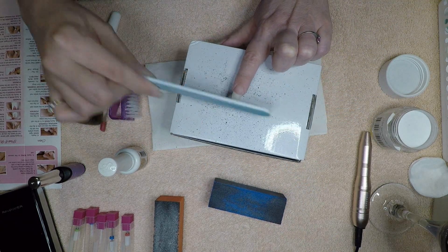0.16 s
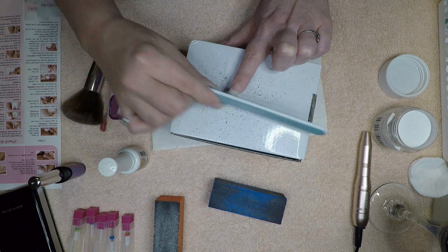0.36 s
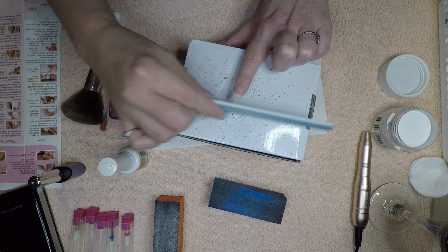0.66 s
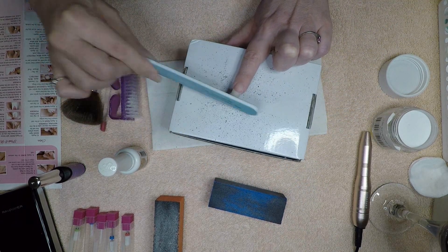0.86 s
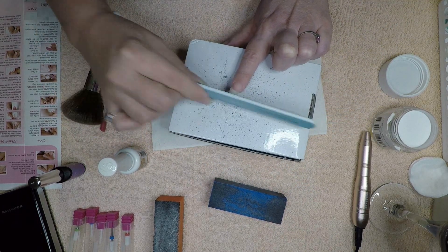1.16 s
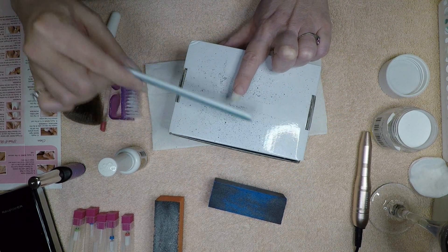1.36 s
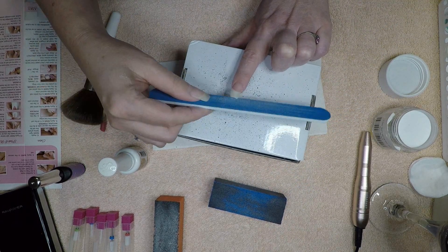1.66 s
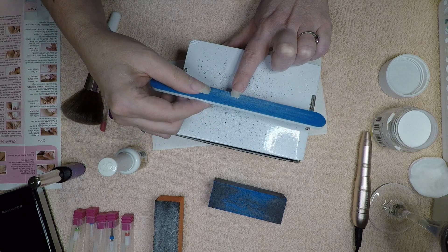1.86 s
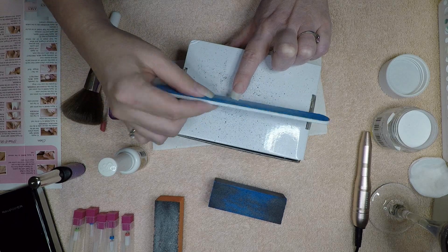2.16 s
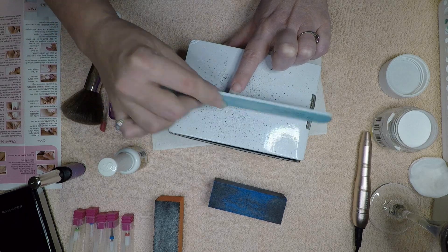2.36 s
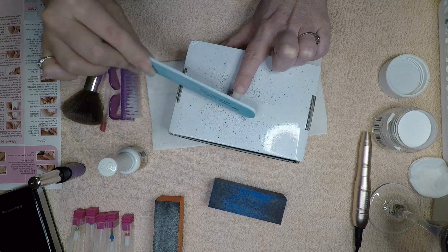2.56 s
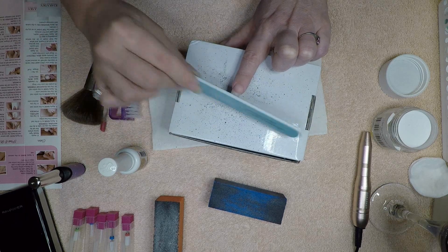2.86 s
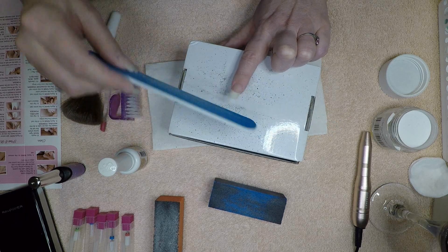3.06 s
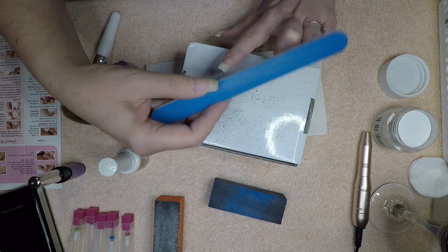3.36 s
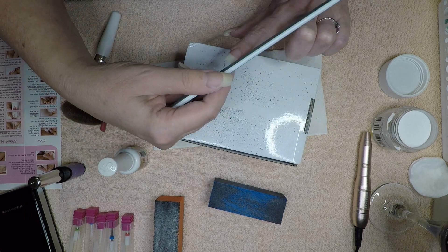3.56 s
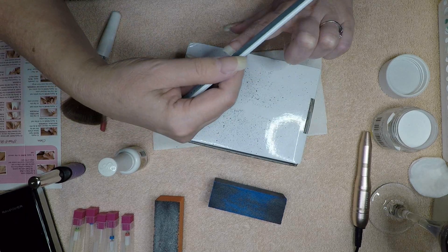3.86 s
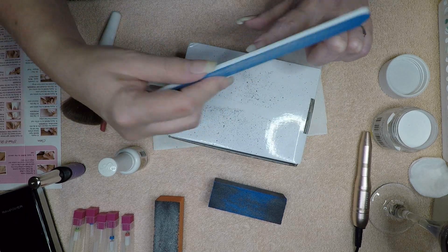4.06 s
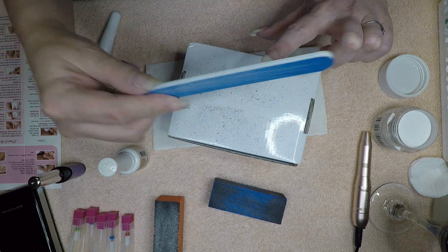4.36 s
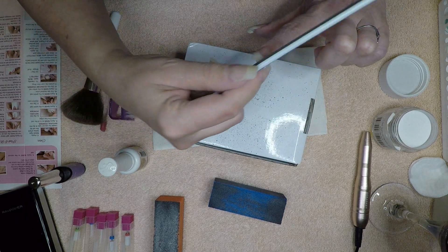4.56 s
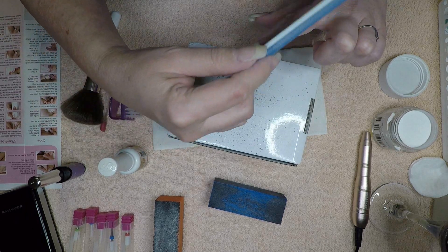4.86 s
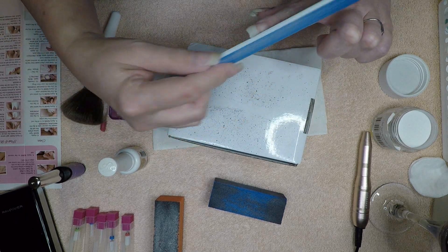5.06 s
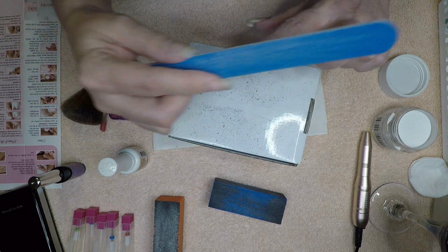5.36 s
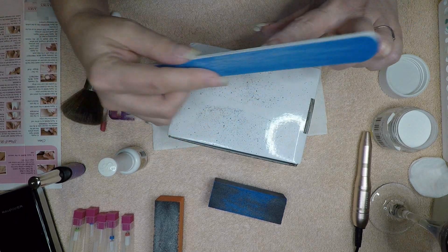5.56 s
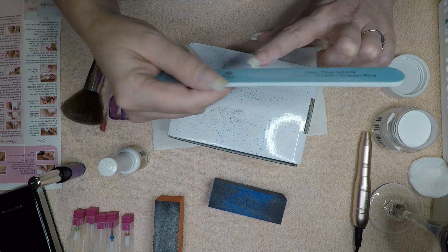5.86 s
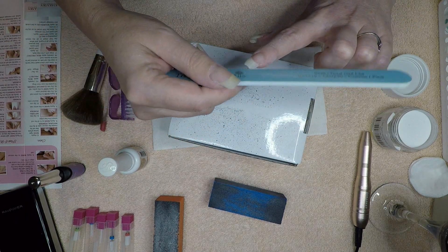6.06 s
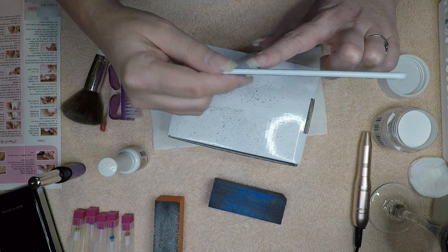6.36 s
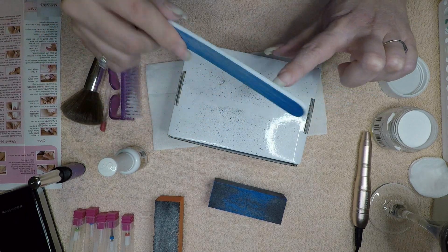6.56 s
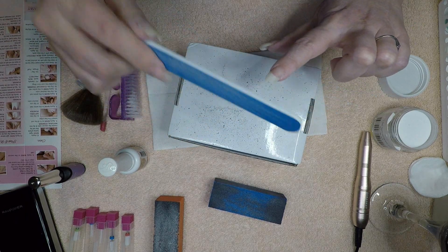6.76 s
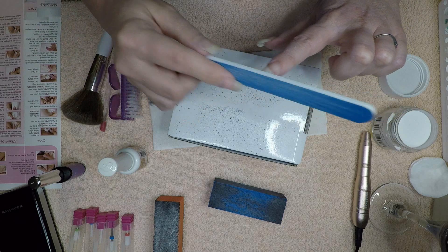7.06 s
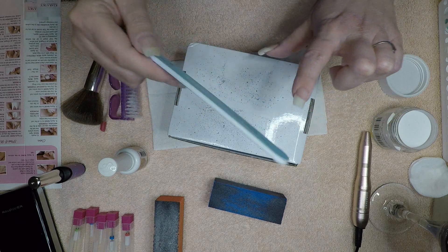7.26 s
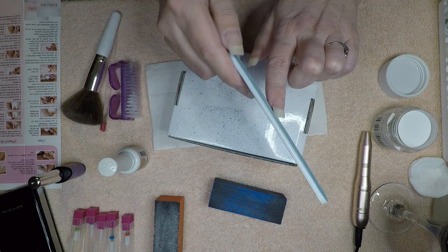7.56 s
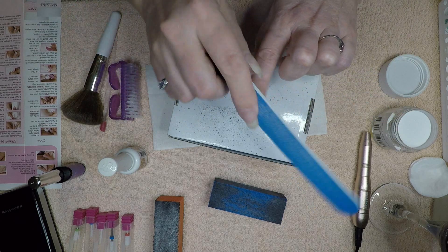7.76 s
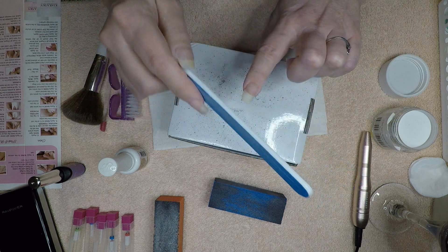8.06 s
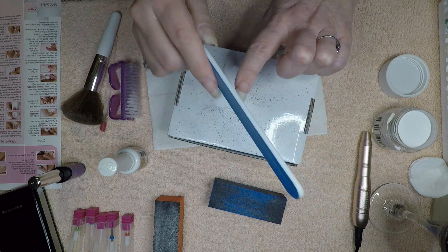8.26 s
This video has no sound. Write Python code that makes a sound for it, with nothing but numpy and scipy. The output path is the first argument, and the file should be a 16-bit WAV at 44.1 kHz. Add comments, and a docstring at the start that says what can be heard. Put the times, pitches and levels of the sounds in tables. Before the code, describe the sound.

A nail file rasps near the microphone, sandy and ringing high up, first in strong separate strokes with dull table rumble and a moderate bump, later in softer, thinner strokes without rumble. A single hard table knock at about three seconds is by far the loudest event. Dry little taps and brushing scuffs fill the gaps; a soft humming noise floor stays constant and room reflections are short.

```python
"""In a small quiet room, an emery board files fingernails over a table, close to a stereo microphone.
Each stroke is gritty noise that rings in nail and board; while the finger rests on the table, it rumbles along.
Around the strokes the board ticks, scuffs and brushes on the nail: short bursts of noise, each around one pitch.
The hand knocks the table, once hard: a crack, a short thud and long low rings. The room adds short reflections
to the nail sounds and knocks. Under it all lies the microphone's own steady noise."""
import sys
import numpy as np
from scipy import signal
from scipy.fft import rfft, irfft
from scipy.io import wavfile

SR = 44100
rng = np.random.default_rng(int(sys.argv[2]) if len(sys.argv) > 2 else 0)


def log_audio(samples):
    """Write samples as a 16-bit WAV file to the path given in sys.argv[1]."""
    # one column per channel
    frames = np.atleast_2d(samples).T
    # limit to full scale, then quantise
    limited = np.clip(frames, -1, 1)
    pcm = np.round(limited * 32767).astype(np.int16)
    wavfile.write(sys.argv[1], SR, pcm)


N = 370440
TIME = np.arange(N) / SR
HZ = np.maximum(np.arange(N // 2 + 1) * SR / N, 1)

# long rings of table and room after a knock; the level is before each knock's own ring level is added:
# (f/Hz, level re thud/dB, time to fall by 60 dB/s)
TABLE_RINGS = [(165.3, -24, 0.23), (187, -30, 0.27), (214.2, -13.5, 0.29), (263, -44, 0.23),
               (296, -17, 0.16), (332.4, -23.5, 0.3), (369.7, -20.5, 0.243), (396, -38, 0.4),
               (478, -38, 0.24), (553, -39, 0.25), (660, -45, .35), (987, -43, 0.27)]
# stereo width of the close sounds: (f/Hz, side minus mid/dB)
CLOSE_WIDTH = [(100, 11), (250, -13), (500, 5), (800, -3), (1200, -17), (1800, -6), (2800, -56),
               (4200, -21), (6400, -7), (8200, -2), (9800, 0), (12000, -1.5), (15000, -14)]
BITE_FOLLOWS, DRONE_FOLLOWS, RUMBLE_FOLLOWS = 0.69, 0.58, 0.4  # share of the stroke's swing in dB
EDGE_S, RUMBLE_RELEASE_S = 0.005, 0.026  # the rasp starts and stops this fast; the table rumbles on a little


def from_db(db):
    """Turn decibels into gain."""
    return 10 ** (np.asarray(db) / 20)


def rms_one(x):
    """Scale to unit power."""
    return x / np.sqrt(np.mean(x ** 2) + 1e-20)


def gain_at(points, hz=HZ):
    """Turn a spectrum table into gains, joined on a log-frequency axis."""
    at, db = np.transpose(points)
    return from_db(np.interp(np.log(hz), np.log(at), db))


def stereo(mid, side=0, pan_db=0):
    """Make left and right from mid and side; a positive pan leans left."""
    left = (mid + side) * from_db(pan_db / 2)
    right = (mid - side) * from_db(-pan_db / 2)
    return np.array([left, right])


def band(x, low_hz, high_hz, order=2):
    """Keep only the band between two frequencies."""
    return signal.sosfilt(signal.butter(order, [low_hz, high_hz], "band", fs=SR, output="sos"), x + 1e-18)


def high_pass(x, lowest_hz, order):
    """Take away what lies below the lowest frequency."""
    return signal.sosfilt(signal.butter(order, lowest_hz, "high", fs=SR, output="sos"), x)


def resonance(centre_hz, width_hz, hz=HZ):
    """Gain of one resonance, 1 on top."""
    return 1 / np.sqrt(1 + ((hz ** 2 - centre_hz ** 2) / (hz * width_hz)) ** 2)


def noise(gain):
    """Steady noise of the given colour, unit power."""
    return rms_one(irfft(rfft(rng.standard_normal(N)) * gain, N))


def add(out, s, sound):
    """Mix a sound in from time s."""
    start = max(round(s * SR), 0)
    out[:, start:start + sound.shape[1]] += sound[:, :N - start]


def microphone_noise(mid_db=-49.5, side_db=-48.5):
    """The microphone's own steady noise, strongest low down and wide between the ears."""
    # colour of the middle: (f/Hz, relative level per Hz/dB)
    mid_colour = [(20, -25), (33, -19.5), (70, -29), (110, -35.5), (150, 1), (195, -2), (240, 0.5),
                  (310, -9), (500, -15), (900, -21.5), (2000, -25.5), (4800, -31.5), (6200, -28),
                  (10000, -31.5), (15000, -46)]
    # colour of the difference between the ears: (f/Hz, relative level per Hz/dB)
    side_colour = [(20, -33), (80, -36), (115, -25), (155, 6.5), (200, -1.5), (260, 0.5), (330, -1.5),
                   (900, -4), (2000, -16), (4400, -32), (6200, -22), (10000, -26), (15000, -39)]
    mid = from_db(mid_db) * noise(gain_at(mid_colour))
    side = from_db(side_db) * noise(gain_at(side_colour))
    return stereo(mid, side, pan_db=-1.0)


def reverb(x, first_echo_s=0.004, t60_s=0.37):
    """Dense reflections of the small room, different at each ear: noise that falls by 60 dB in t60_s."""
    t = TIME[:SR // 2]
    tail = rng.standard_normal((2, len(t))) * from_db(-60 * t / t60_s) * (t > first_echo_s)
    tail = tail / np.sqrt((tail ** 2).sum(axis=1, keepdims=True))
    return signal.fftconvolve(x, tail, axes=1)[:, :N]


def without_deep_bass(x, lowest_hz=130):
    """The microphone picks up no deep bass: a steep low cut."""
    return high_pass(x, lowest_hz, order=7)


def contact(start_s, end_s, release_s):
    """The board lands quickly, stays, and its sound dies away after it lifts."""
    landing = np.clip((TIME - start_s) / EDGE_S + 1, 0, 1)
    return landing * np.exp(-np.maximum(TIME - end_s, 0) / release_s)


def swing_db(start_s, rise_s, fall_s, landing_db, fade_db):
    """A stroke speeds up to its height and slows again: an arch in dB, 0 at the height."""
    late = TIME - start_s - rise_s
    before = landing_db * np.clip(late / rise_s, -1, 0) ** 2
    after = fade_db * np.clip(late / fall_s, 0, 1) ** 2
    return -before - after


def propped_gains():
    """Hiss, bite and table rumble all follow the swing of each stroke with the finger propped on the table."""
    # levels at the height, before each layer's trim: (start/s, rise/s, fall/s, hiss level/dB,
    # landing below the height/dB, fade by the end/dB, bite level re hiss/dB, rumble level/dB)
    strokes = [ (0.077, 0.065, 0.11, -34.5, 6.5, 25.5, -10.5, -35),
               (0.458, 0.049, 0.11, -31.5, 4, 23, -11.5, -34.5),
               (0.846, 0.046, 0.12, -33, 4, 23.5, -12, -35),
               (1.244, 0.055, 0.14, -33.5, 2.5, 20.5, -12, -35),
               (2.457, 0.11, .112, -38, 8, 15.5, -11, -40.5),
               (2.922, 0.079, 0.04, -35.5, 9, -1.5, -11.5, -41.5)]
    hiss, bite, rumble = np.zeros((3, N))
    for s, rise, fall, db, landing_db, fade_db, bite_db, rumble_db in strokes:
        end = s + rise + fall
        swing = swing_db(s, rise, fall, landing_db, fade_db)
        touching = contact(s, end, EDGE_S)
        hiss += touching * from_db(db + swing)
        bite += touching * from_db(db + bite_db + BITE_FOLLOWS * swing)
        rumble += contact(s, end, RUMBLE_RELEASE_S) * from_db(rumble_db + RUMBLE_FOLLOWS * swing)
    return hiss, bite, rumble


def table_rumble(level_db=-0.1, side_db=-15, boom_db=3, shift_decay_s=0.033):
    """The rubbing travels down the propped finger into the table, whose lowest mode booms along."""
    # colour of the rumble: (f/Hz, relative level per Hz/dB)
    rumble_colour = [(20, -70), (70, -48), (118, -42), (146, 2.5), (210, 3), (280, 4), (370, -3),
                     (450, -6.5), (580, -21), (730, -17), (900, -56), (2000, -57)]
    # the propped finger shifts on the table: (time/s, rumble level before level_db/dB)
    finger_shifts = [(0.031, -35.5), (0.80, -40.5), (1.02, -50), (1.19, -46), (1.415, -43), (1.575, -48),
                     (1.772, -48), (2.26, -43.5), (2.888, -42)]
    boom = from_db(boom_db) * resonance(TABLE_RINGS[0][0], width_hz=8.4)
    colour = gain_at(rumble_colour) * np.sqrt(1 + boom ** 2)
    drag = stereo(noise(colour), from_db(side_db) * noise(colour), pan_db=-4.5)
    _, _, strokes = propped_gains()
    shifts = sum(from_db(db) * contact(s, s, shift_decay_s) for s, db in finger_shifts)
    return without_deep_bass(from_db(level_db) * np.hypot(strokes, shifts) * drag)


def crack(pitch_hz, overtone_db, overtone_ratio=2.23):
    """Two short, heavily damped rings at the point of contact; the lower one peaks at 1."""
    click = signal.unit_impulse(SR // 2)
    over_hz = overtone_ratio * pitch_hz
    low = band(click, 0.76 * pitch_hz, 1.26 * pitch_hz)
    high = band(click, 0.73 * over_hz, 0.97 * over_hz)
    return low / abs(low).max() + from_db(overtone_db) * high / abs(high).max()


def knocks(thud_hz=284, thud_at_s=0.00518, ring_delay_s=0.00508, crack_room_db=-7, thud_room_db=-15):
    """A dull crack at the contact, a thud that swells and dies in a few cycles, and long low rings."""
    # the hand bumps the table: (time/s, thud level/dB, thud length/s, long rings re thud/dB,
    # crack level/dB, crack f/Hz, its overtone re crack/dB)
    bumps = [(0.018, -33, 0.0034, 4.5, -47, 1190, -9), (0.4071, -13, .002, -3.5, -32.5, 1540, -2.5),
             (0.788, -27.5, 0.0028, -6, -55, 1500, -5), (1.177, -32.5, 0.0033, -7, -50, 1500, -9),
             (2.257, -34, .0028, 2, -55, 1500, -5), (3.048, -0.9, .0029, 0, -19, 1140, -11.5),
             (5.543, -34, 0.0018, -6, -44, 1500, -7)]
    t = TIME[:SR // 2]
    late = np.maximum(t - ring_delay_s, 0)
    rings = np.zeros(len(t))
    for k, (hz, db, t60) in enumerate(TABLE_RINGS):
        sign = (-1) ** k  # every second ring starts downwards
        rings += sign * from_db(db - 60 * late / t60) * np.sin(2 * np.pi * hz * late)
    thuds, cracks = np.zeros((2, 2, N))
    for s, thud_db, length_s, ring_db, crack_db, hz, overtone_db in bumps:
        around = t - thud_at_s
        thud = np.exp(-(around / length_s) ** 2) * np.sin(2 * np.pi * thud_hz * around)
        body = without_deep_bass(from_db(ring_db) * rings - thud, lowest_hz=142)
        add(thuds, s, stereo(from_db(thud_db) * body, pan_db=-4.5))
        add(cracks, s, stereo(-from_db(crack_db) * crack(hz, overtone_db)))
    thuds_in_room = thuds + from_db(thud_room_db) * reverb(thuds)
    return thuds_in_room + cracks + from_db(crack_room_db) * reverb(cracks)


def touch(envelope, pitch_hz, width_hz, top_re_pitch=1.41, sheen=0.24, grain_db=5.0):
    """A brief burst of gritty friction that rings around one pitch, with a faint sheen above it."""
    # colour of a nail touched lightly while a fingertip holds it: (f/Hz, gain/dB)
    fingertip_colour = [(1000, 2.5), (3000, 1), (4200, -1), (4950, -4), (5450, 1.5), (6100, 3.5), (6800, 3),
                        (8000, -1), (10000, 2), (11400, -7), (13500, -1)]
    size = len(envelope)
    hz = np.maximum(np.arange(size // 2 + 1) * SR / size, 1)
    top = sheen + 1 / (1 + (hz / (top_re_pitch * pitch_hz)) ** 10)
    grains = rng.standard_normal((2, size)) * from_db(grain_db * np.minimum(rng.exponential(1, size), 5))
    colour = resonance(pitch_hz, width_hz, hz) * top * gain_at(fingertip_colour, hz)
    mid, side = rfft(grains) * colour
    mid = irfft(mid, size)
    side = irfft(side * gain_at(CLOSE_WIDTH, hz), size)
    return envelope * stereo(mid, side) / np.std(mid)


def swell(late, rise_s, fall_s):
    """A bell-shaped envelope with its top at time 0 and unequal sides."""
    return np.exp(-(late / np.where(late < 0, rise_s, fall_s)) ** 2 / 2 ** .5)


def ticks_and_scuffs(tick_breadth=11, tick_rise_s=0.00097):
    """Taps start at once and die, the shorter the broader; scuffs swell, stop and trail; brushes fade."""
    # the board taps the nail: (start/s, level before the quick rise and decay/dB, f/Hz, decay/s)
    taps = [(0.012, -42, 6540, 0.0041), (0.025, -30, 7100, 0.0057), (0.246, -39.5, 7250, .0037),
            (0.408, -35.5, 6340, 0.0024), (0.616, -36, 6800, 0.0025), (0.786, -36.5, 6800, .0023),
            (1.175, -36, 6850, 0.0025), (1.776, -47.5, 6360, .004), (2.256, -37, 6740, .0035),
            (2.264, -32.5, 7040, .003), (2.385, -43, 6800, .003), (2.883, -52, 6780, .003),
            (3.249, -40, 6200, 0.0046), (3.353, -43, 6150, .0067), (3.456, -43, 6100, .0065),
            (3.555, -40, 6000, .0029), (4.378, -23.5, 7900, 0.0014), (4.683, -30.5, 5600, .0053),
            (4.811, -35, 5700, 0.004), (5.545, -38, 5500, .0027), (7.083, -46, 6500, .003),
            (7.559, -47, 6600, 0.0073), (8.267, -39.5, 6860, .0025), (8.276, -42, 6500, .003)]
    # the board catches the nail in a short scuff: (height at/s, rise/s, level/dB, f/Hz, breadth of ring/Hz)
    catches = [(3.055, 0.016, -40, 5860, 1400), (3.080, .0094, -39, 6460, 1000),
               (3.098, 0.015, -35, 6230, 1380), (3.181, 0.018, -48.5, 6260, 1800),
               (3.372, .015, -40, 6400, 1910), (3.571, 0.0085, -37.5, 5950, 450),
               (3.757, .012, -49.5, 6060, 1800), (3.830, 0.022, -54.5, 6250, 1800),
               (4.652, 0.017, -51.5, 6000, 3500), (5.351, 0.0082, -28.5, 6250, 1860),
               (5.628, .01, -38, 6160, 1800), (6.167, .011, -50.5, 5340, 2500),
               (7.274, 0.012, -34.5, 6200, 2800), (7.897, 0.024, -30, 6340, 2600),
               (7.988, 0.018, -33.5, 5820, 2010)]
    # the board brushes the nail while it is moved into place: (height at/s, fall/s, level/dB)
    brush_strokes = [(1.574, 0.027, -51.5), (3.121, 0.036, -55), (3.237, 0.2, -58.5), (3.413, 0.033, -54),
                     (3.499, 0.055, -57), (3.928, 0.035, -56.5), (4.384, .035, -53.5),
                     (4.719, 0.099, -54.5), (4.986, .028, -51), (5.845, 0.057, -55.5), (6.945, 0.031, -52),
                     (7.40, .065, -57)]
    scuff_fall_share = 0.55  # a scuff stops faster than it swells
    trail_db, trail_s = -17, 0.04  # and the board trails on lightly after it
    brush_hz, brush_width_hz, brush_rise_share = 6530, 4600, 0.55
    out, t = np.zeros((2, N)), TIME[:2 ** 14]
    for s, db, hz, decay in taps:
        envelope = (1 - np.exp(-t / tick_rise_s)) * np.exp(-t / decay)
        add(out, s, touch(from_db(db) * envelope, hz, tick_breadth / decay))
    late = t - t.mean()  # time 0 in the middle, for the height
    for s, rise, db, hz, width in catches:
        main = swell(late, rise, scuff_fall_share * rise)
        trail = from_db(trail_db) * swell(late, rise, trail_s)
        add(out, s - t.mean(), touch(from_db(db) * np.maximum(main, trail), hz, width))
    for s, fall, db in brush_strokes:
        envelope = from_db(db) * swell(late, brush_rise_share * fall, fall)
        add(out, s - t.mean(), touch(envelope, brush_hz, brush_width_hz))
    return out


def grit(gain, grain_db=3.5, chatter_db=0.5, chatter_hz=110):
    """Countless uneven grains catch on the nail, in clumps as the board sticks and slips; unit mid power."""
    clumps = from_db(chatter_db * noise(1 / (1 + (HZ / chatter_hz) ** 2)))
    sizes = from_db(grain_db * np.minimum(rng.exponential(1, N), 6))
    mid, side = irfft(rfft(rng.standard_normal((2, N)) * sizes * clumps) * gain, N)
    side = irfft(rfft(side) * gain_at(CLOSE_WIDTH), N)
    return stereo(mid, side) / np.std(mid)


def nail_ring(ring_db):
    """The resonances of nail and board, as a gain over the plain rasp."""
    # (f/Hz, width/Hz, level over the plain rasp before ring_db is added/dB)
    nail_modes = [(5680, 440, 11), (6596, 220, 11), (7710, 160, 7), (8580, 310, 5.5), (9240, 320, 8),
                  (12900, 900, -10)]
    power = sum((from_db(db + ring_db) * resonance(hz, width)) ** 2 for hz, width, db in nail_modes)
    return np.sqrt(1 + power)


def pressure(wobble_db=1.0, wobble_hz=21.3):
    """The hand's pressure is never quite even: a slowly wandering gain about 1."""
    return from_db(wobble_db * noise(1 / (1 + (HZ / wobble_hz) ** 4)))


def gliding_echo(x, strength=.5, delay_s=.0008, sway=.3, sway_hz=2.62):
    """A reflection off the table whose path changes as the hands move, so that bands glide through the rasp."""
    delay = delay_s * np.exp(sway * noise(1 / (1 + (HZ / sway_hz) ** 4)))
    echo = np.array([np.interp(TIME - delay, TIME, ear) for ear in x])
    return (x + strength * echo) / np.sqrt(1 + strength ** 2)


def lifted_gains(release_s=0.0098):
    """Hiss, bite and the drone of the board all follow the swing of each stroke with the finger lifted."""
    # levels at the height, before each layer's trim: (start/s, rise/s, fall/s, hiss level/dB,
    # landing below the height/dB, fade by the end/dB, bite level re hiss/dB, drone level re hiss/dB)
    strokes = [ (4.031, 0.097, 0.094, -40.5, 13, 10, -4.5, -11),
               (4.224, 0.043, 0.097, -41, 7, 10, -9.5, -8.5), (5.057, .055, .035, -40, 9, 2, -5, -15.5),
               (5.155, 0.02, .16, -39.5, 2, 13, -9.5, -16.5), (5.567, 0.066, 0.13, -36.5, 12, 14, -8, -15),
               (6.415, 0.2, .16, -38, 16, 14, -11.5, -16), (7.106, 0.14, 0.021, -36.5, 9.5, 0, -11, -15.5),
               (7.688, 0.039, 0.034, -47, 6.5, 8, -10, -13), (7.77, 0.094, 0.0084, -46, 11.5, 0, -10.5, -7),
               (8.323, .075, .02, -44.5, 7.5, 0, -9.5, -9.5)]
    hiss, bite, drone = np.zeros((3, N))
    for s, rise, fall, db, landing_db, fade_db, bite_db, drone_db in strokes:
        swing = swing_db(s, rise, fall, landing_db, fade_db)
        level = from_db(db) * contact(s, s + rise + fall, release_s)
        hiss += level * from_db(swing)
        bite += level * from_db(bite_db + BITE_FOLLOWS * swing)
        drone += level * from_db(drone_db + DRONE_FOLLOWS * swing)
    return hiss, bite, drone


def filing(lowest_hz=170):
    """A hiss that rings in the nail, over the grit's lower bite; with the finger lifted the board drones too."""
    # colours of the layers, each before its ring and echo: (f/Hz, relative level per Hz/dB)
    propped_hiss = [(3500, -7.5), (5000, -4), (6200, 0), (7300, 6), (9500, -7.5), (10000, -5.5),
                    (10600, -1), (11300, -9.5), (12000, -4), (14000, -8), (15500, -22)]
    propped_bite = [(500, -2), (1000, -3.5), (1600, -1), (2300, -2), (3200, 4), (4200, 4), (4900, 1.5),
                    (6000, -27)]
    lifted_hiss = [(3500, -28), (5000, -6.5), (6300, 5.5), (7400, 4.5), (8600, -3), (10000, -9.5),
                   (11400, -18), (12500, -15), (14000, -14), (15500, -31)]
    lifted_bite = [(1500, -18), (2400, -10), (3200, -1), (4200, 1.5), (4900, -4), (5500, -4), (6800, -24)]
    board_drone = [(500, -17), (1000, -5.5), (1600, 1.5), (2000, -1.5), (2400, -0.5), (2900, -2),
                   (4000, -47)]
    hiss, bite, _ = propped_gains()
    propped = from_db(-1.7) * hiss * grit(gain_at(propped_hiss) * nail_ring(ring_db=7.5))
    propped += from_db(-1.25) * bite * grit(gain_at(propped_bite))
    hiss, bite, drone = lifted_gains()
    lifted = from_db(-0.96) * hiss * grit(gain_at(lifted_hiss) * nail_ring(ring_db=-9))
    lifted += from_db(-1.5) * bite * grit(gain_at(lifted_bite))
    lifted += from_db(-1.7) * drone * grit(gain_at(board_drone))
    rasp = gliding_echo(propped, strength=0.24, delay_s=0.0016, sway=0.2)
    rasp += gliding_echo(lifted, strength=0.27, delay_s=0.001106, sway=0.243)
    return high_pass(pressure() * rasp, lowest_hz, order=2)


def scene():
    """Nail sounds and table sounds over the microphone's noise."""
    # how the nail sounds lean between the ears: (f/Hz, left minus right/dB)
    ear_lean = [(1000, 2.5), (3000, 0), (5000, 0.5), (6200, 3.5), (7200, 0), (8300, -3.5), (10000, -3.5),
                (12000, 0.5)]
    nail = filing() + ticks_and_scuffs()
    lean = np.sqrt(gain_at(ear_lean))  # half of the difference to each ear
    nail = irfft(rfft(nail) * [lean, 1 / lean], N)
    return nail + from_db(-15) * reverb(nail) + knocks() + table_rumble() + microphone_noise()


def record(dry, cutoff_hz=15300):
    """Peaks stop at full scale, then the top is cut steeply."""
    low_pass = signal.ellip(10, .1, 80, cutoff_hz, fs=SR, output="sos")
    return signal.sosfilt(low_pass, np.clip(dry, -1, 1))


dry = scene()
out = record(dry)
log_audio(out)
```